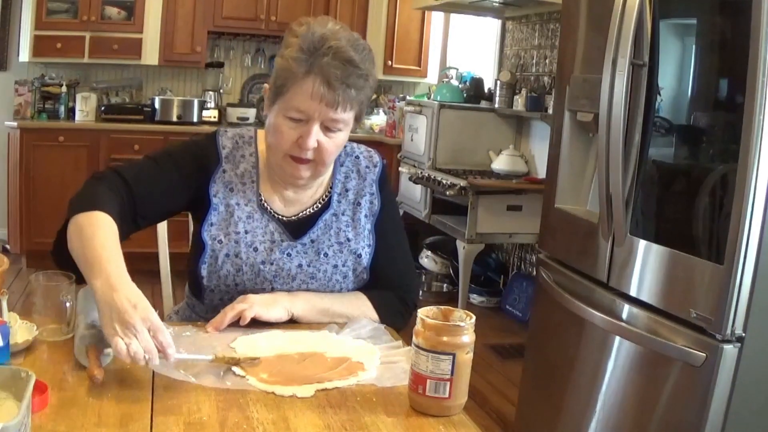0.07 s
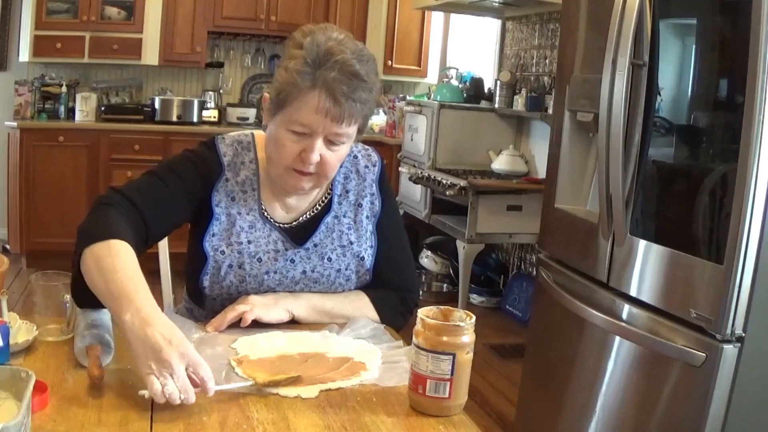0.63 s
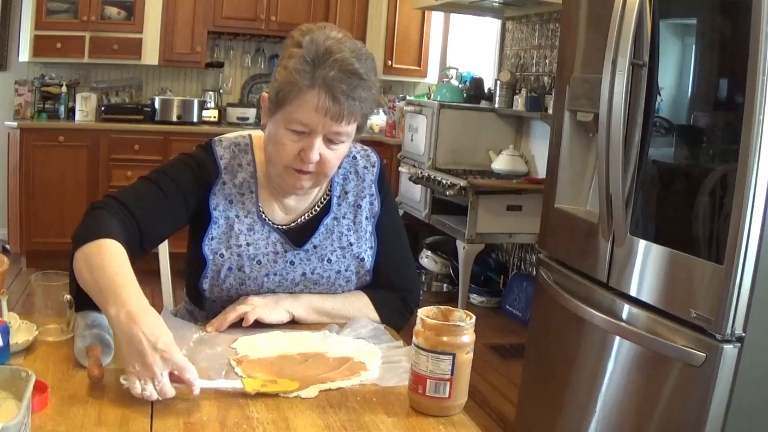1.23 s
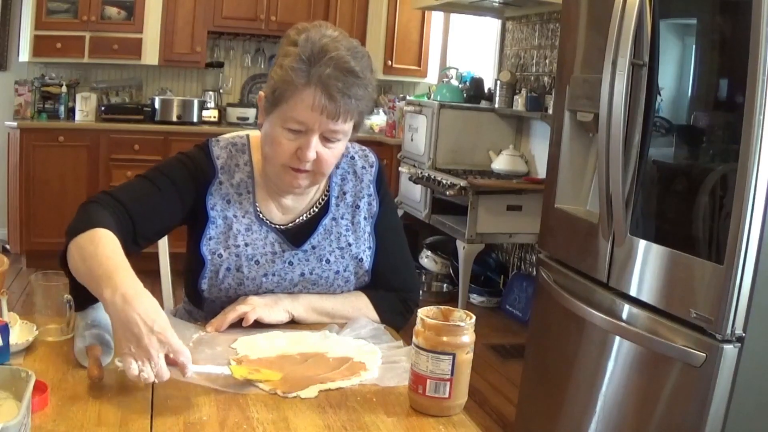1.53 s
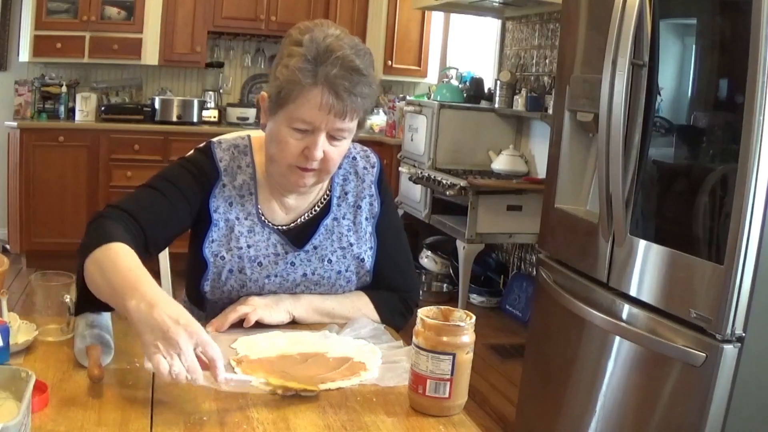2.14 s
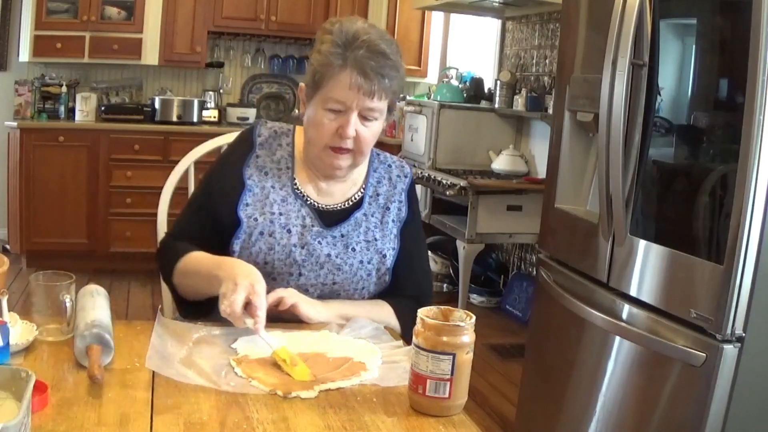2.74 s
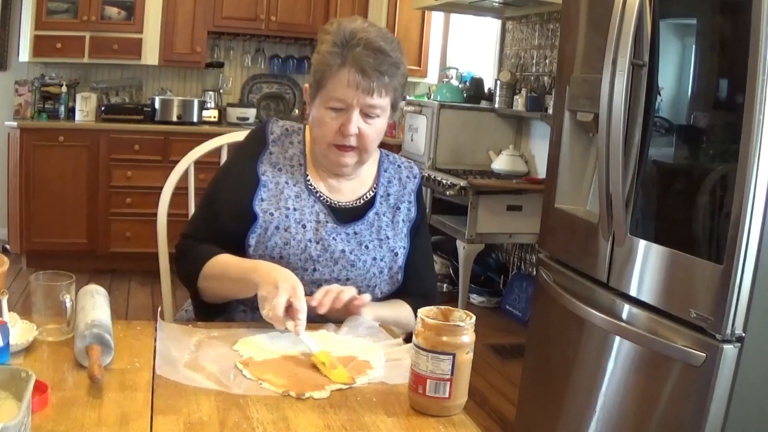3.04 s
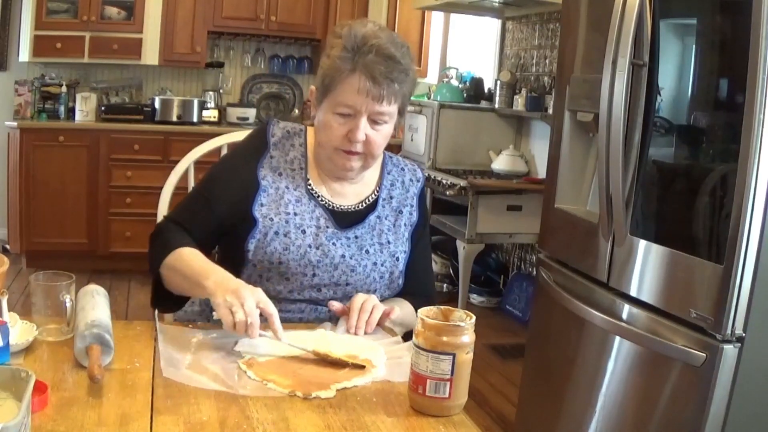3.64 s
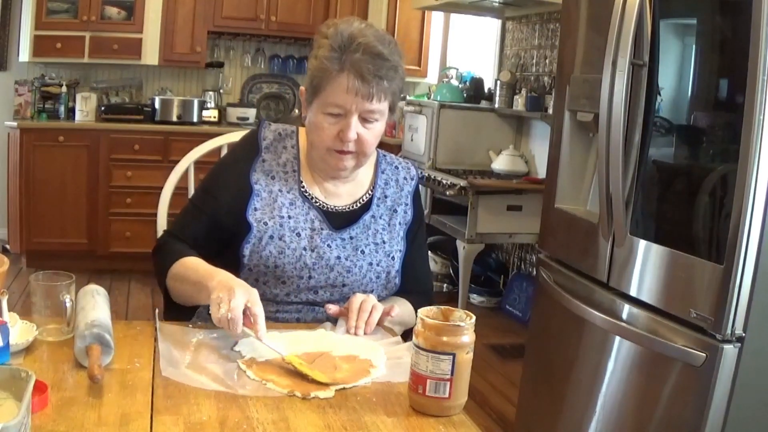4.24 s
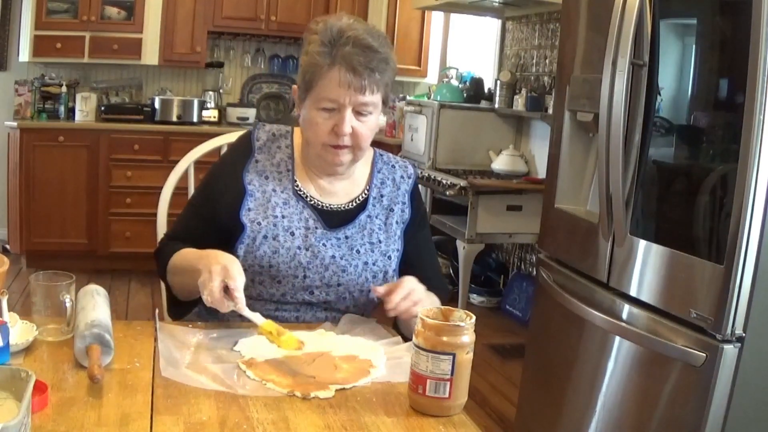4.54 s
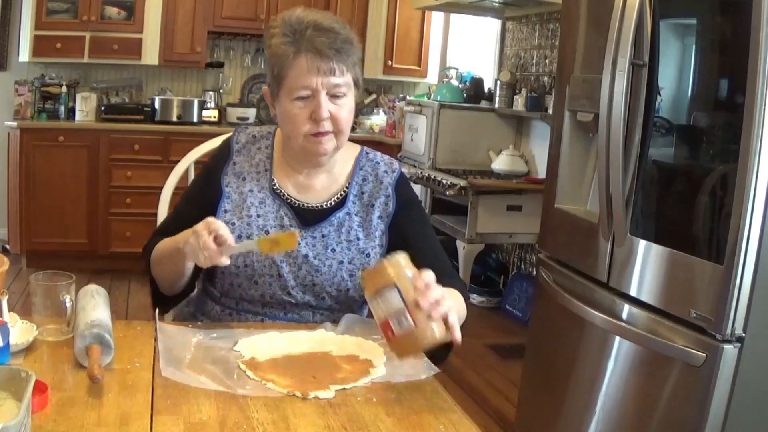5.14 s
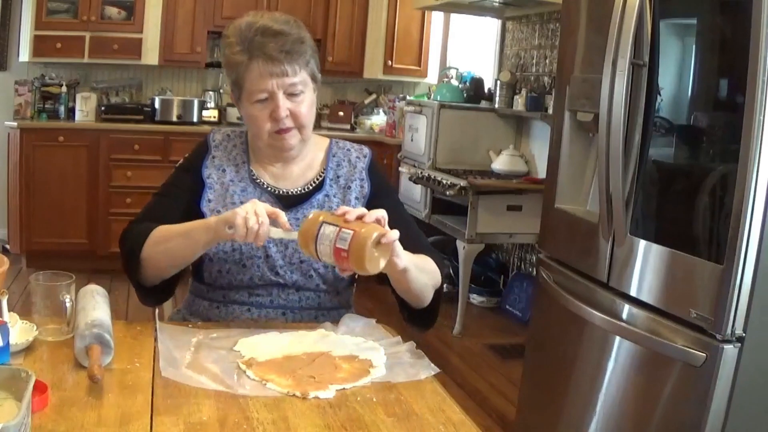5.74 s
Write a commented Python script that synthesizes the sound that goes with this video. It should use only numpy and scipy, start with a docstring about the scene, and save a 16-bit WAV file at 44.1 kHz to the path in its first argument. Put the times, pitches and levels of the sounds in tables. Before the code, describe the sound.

In a quiet kitchen, a crisp burst of wax paper crinkling thins out into small snaps and light rustles as dough is spread with a spatula. One light knock on wood is followed by a thin hiss of a hand on the paper and further crackles. Then a jar bumps softly twice on the table as it is lifted. A refrigerator hums and ticks faintly behind the nearby handling.

```python
"""Wax paper slides, rustles and snaps on a wooden kitchen table as a spatula spreads peanut butter
over the rolled dough on it. Stick-slip friction makes the rustle, buckling creases the snaps.
The spatula knocks once, a hand glides over the wax, and a jar is taken up with two soft bumps
that excite the modes of the table top. Sleeve, hand and jar brush the wood.
The kitchen reverberates, while a refrigerator hums and ticks faintly over the room noise."""
import sys
import numpy as np
from scipy import signal
from scipy.fft import rfft, irfft, next_fast_len
from scipy.io import wavfile

SR = 44100
rng = np.random.default_rng(int(sys.argv[2]) if len(sys.argv) > 2 else 0)


def wav_out(sig):
    """Save sig, one row per channel (or a flat mono array), as 16-bit PCM at SR to the path in sys.argv[1]."""
    wavfile.write(sys.argv[1], SR, np.round(np.clip(np.atleast_2d(sig).T, -1, 1) * 32767).astype(np.int16))


N = 263718

# creases snapping over: (t/s, level over 10 ms/dB, swell time/s, flap resonance f/Hz)
CREASE_SNAPS = [(0.075, -40.5, .0025, 7900), (0.0877, -33.5, 0.00037, 10100), (0.189, -39, 0.001, 10500),
                (0.2418, -26.5, 0.00053, 10200), (0.2677, -27, 0.0016, 9100), (0.2816, -30, 0.0019, 6960),
                (0.3025, -35, 0.0019, 5450), (0.316, -39.5, 0.0013, 8850), (0.501, -35, 0.002, 9500),
                (0.5514, -40.5, .0007, 9800), (0.7004, -54, .0012, 1800), (0.761, -36, 0.0013, 9500),
                (1.2225, -43, 0.0022, 9000), (1.2582, -45, 0.0012, 7000), (1.344, -46.5, 0.00071, 5460),
                (1.388, -42, .0014, 2110), (1.4063, -43.5, 0.0014, 2580), (1.4715, -59, 0.0016, 2500),
                (1.631, -43.5, 0.0016, 8450), (1.719, -52.5, 0.0013, 9400), (1.9067, -53, 0.0021, 9500),
                (2.4688, -51, 0.0019, 8700), (2.506, -51.5, 0.0008, 8450), (2.8375, -52.5, 0.00098, 10200),
                (3.1322, -48.5, 0.00029, 9700), (3.347, -35.5, 0.0039, 5600), (3.358, -39, 0.0015, 1910),
                (3.4003, -30, 0.00059, 1940), (3.4983, -45.5, 0.00095, 2310), (3.5508, -47, .0004, 9300),
                (3.7048, -50, .0007, 6000), (3.7246, -47.5, .0011, 5540), (3.887, -41.5, 0.00097, 10400),
                (3.9147, -46.5, 0.00076, 10200), (4.046, -38, 0.0026, 8800), (4.345, -49.5, .0013, 1800),
                (4.3741, -40.5, 0.00064, 2050), (4.43, -40.5, 0.00092, 6050), (4.6587, -55.5, 0.0013, 4640),
                (5.044, -51, .0013, 5800)]
# spectrum of the paper's crisp crackle: (f/Hz, relative spectral density/dB)
CRACKLE_SPECTRUM = [(1200, -27), (2500, -13), (4000, -4.5), (6000, -2.5), (8000, -.5), (9600, 1.5),
                    (11000, -5.5), (14000, -6)]


def from_db(db):
    """Amplitude ratio: a factor of ten for every 20 dB."""
    return 10 ** (np.asarray(db) / 20)


def rms_one(x):
    """Normalisation to unit mean power."""
    return x / np.sqrt(np.mean(x ** 2) + 1e-20)


def clock():
    """Uniform sampling: t/s of each sample."""
    return np.arange(N) / SR


def at_hz(points, hz):
    """Interpolation of a table along logarithmic frequency."""
    known, values = np.transpose(points)
    return np.interp(np.log(np.maximum(hz, 1)), np.log(known), values)


def colour(x, spectrum):
    """Minimum-phase filtering to the given spectrum, at unit power gain."""
    size = next_fast_len(N + SR // 10) // 2 * 2
    gain = rms_one(from_db(at_hz(spectrum, np.fft.rfftfreq(size, 1 / SR))))
    cepstrum = irfft(np.log(gain))
    cepstrum[1:size // 2] *= 2  # folding onto positive time makes the filter causal
    cepstrum[size // 2 + 1:] = 0
    return irfft(rfft(x, size) * np.exp(rfft(cepstrum)), size)[..., :N]


def drift(per_s):
    """Random modulation of unit power: straight lines between Gaussian values."""
    knots = np.arange(0, N / SR + 1, 1 / per_s)
    return rms_one(np.interp(clock(), knots, rng.standard_normal(N)[:len(knots)]))


def swell(start, end):
    """Half-sine envelope: a movement sets in and dies away."""
    return np.sin(np.pi * np.clip((clock() - start) / (end - start), 0, 1))


def stereo(mid, side, side_db):
    """Sum and difference: mid reaches the ears in phase, side in antiphase."""
    return mid + from_db(side_db) * side * [[1], [-1]]


def narrow_noise(hz, width_hz):
    """A randomly driven resonance: a band of noise mostly common to both ears."""
    band = signal.butter(2, [hz - width_hz / 2, hz + width_hz / 2], "band", fs=SR, output="sos")
    mid, side = rng.standard_normal((2, N))
    return rms_one(signal.sosfilt(band, stereo(mid, side, side_db=-7.5)))


def grains(per_s, spread_db):
    """A Poisson process of tiny slips, of uneven size and either sign."""
    sizes = from_db(spread_db * np.minimum(rng.exponential(1, N), 4))
    slips = rng.random(N) < per_s / SR
    return rms_one(slips * sizes * rng.choice([-1, 1], N))


def push(s, db, contact_s):
    """Impact force: a smooth pulse of given impulse, the duller the longer the contact."""
    pulse = np.sin(np.pi * np.clip((clock() - s) / contact_s, 0, 1)) ** 2
    return from_db(db) * pulse / pulse.sum()


def ring(force, modes):
    """Modal superposition: a force drives damped resonators, neighbours in opposite phase."""
    out = np.zeros(N)
    for k, (hz, db, t60) in enumerate(modes):
        radius, angle = from_db(-60 / (t60 * SR)), 2 * np.pi * hz / SR
        feedback = [1, -2 * radius * np.cos(angle), radius ** 2]
        out += (-1) ** k * from_db(db) * signal.lfilter([.5, 0, -.5], feedback, force + 1e-18)
    return out


def sheet_motion():
    """Incoherent powers add: stirring, strokes and settling give crackle and drag envelopes in dB."""
    # strokes pushing the paper: (full speed t/s, 20 dB rise time/s, hold/s, crackle/dB, drag/dB)
    strokes = [(0.0, .05, 0.049, -56.5, -54.5), (0.102, 0.077, 0.039, -41.5, -52.5),
               (0.254, 0.13, 0.038, -31.5, -42), (0.402, 0.12, 0.02, -44.5, -48.5),
               (1.238, 0.2, 0.033, -55.5, -55), (1.391, 0.14, .02, -51, -48.5),
               (1.539, 0.053, .01, -51.5, -50.5), (2.47, 0.089, 0.087, -63, -66),
               (2.931, 0.17, 0.092, -50.5, -54.5), (3.163, 0.28, 0.049, -52, -53.5),
               (3.352, 0.011, 0.0055, -44, -56), (3.916, 0.039, 0.013, -55.5, -58.5),
               (4.372, .035, .015, -53, -48.5), (4.87, 0.068, 0.058, -63, -64)]
    release_db_per_s, settle_db_per_s = 187, 152
    drag_follows = 0.85  # share of the crackle's rise and fall
    t = clock()
    lifted_db = 7 * (t > 4.5)  # the sheet stirs less once the spatula is lifted
    crackle_power = from_db(-72.5 - lifted_db) ** 2
    drag_power = from_db(-69.5 - lifted_db) ** 2
    for s, rise_s, hold_s, crackle_db, drag_db in strokes:
        rise_db = 20 * (t - s) / rise_s
        release_db = release_db_per_s * (s + hold_s - t)
        shape_db = np.clip(np.minimum(rise_db, release_db), -100, 0)
        crackle_power += from_db(crackle_db + shape_db) ** 2
        drag_power += from_db(drag_db + drag_follows * shape_db) ** 2
    for s, db, swell_s, _ in CREASE_SNAPS:
        after = slice(int(s * SR), int(s * SR) + SR // 2)
        fall_db = settle_db_per_s * (t[after] - s)
        share = swell_s / 0.0012  # slower snaps leave more rustle
        crackle_power[after] += share * from_db(db - 15 - fall_db) ** 2
        drag_power[after] += share * from_db(db - 17.5 - drag_follows * fall_db) ** 2
    return 10 * np.log10(crackle_power), 10 * np.log10(drag_power)


def rubbing(crackle_db, drag_db):
    """Stick-slip friction: dense slips in clumps of a few milliseconds, and scattered lone ticks."""
    # the paper's dull drag on the table: (f/Hz, relative spectral density/dB)
    drag_spectrum = [(100, -14), (300, -7), (700, -4), (1300, -4), (1900, 0.5), (2800, -3), (4000, -2.5),
                     (7000, -17.5)]
    clumps = rms_one(from_db(2 * np.clip(drift(per_s=420), -2, 2.5)))
    crackle = from_db(crackle_db + 2) * clumps * grains(per_s=11000, spread_db=1)
    drag = from_db(drag_db) * clumps * grains(per_s=9000, spread_db=-2)
    # ticks grow only slowly with the rubbing, so they stand out when the sheet barely moves
    ticks = from_db(crackle_db / 2 - 36.5) * grains(per_s=27, spread_db=-6.5)
    ticks *= crackle_db > -72
    return colour(crackle + ticks, CRACKLE_SPECTRUM) + colour(drag, drag_spectrum)


def brushing():
    """Sliding friction: cloth, skin and the jar's base swish softly over the table."""
    # passes of sleeve, hand and jar: (start t/s, end t/s, level/dB)
    passes = [(0.0, 0.33, -56.5), (0.607, 0.85, -54.5), (1.335, 1.46, -58), (4.908, 4.997, -55.5)]
    # their friction noise: (f/Hz, relative spectral density/dB)
    swish_spectrum = [(30, 0), (120, -8.5), (330, 2), (700, -3.5), (1400, -10), (4000, -21)]
    envelope = sum(from_db(db) * swell(start, end) for start, end, db in passes)
    return envelope * colour(rng.standard_normal(N), swish_spectrum)


def refrigerator():
    """Resonance and periodic excitation: a wavering hum, and chirps that repeat as the machine turns."""
    # hum resonances: (f/Hz, bandwidth/Hz, level/dB)
    resonances = [(239, 14, -72), (383, 6.5, -74), (499, 8.6, -71), (675.7, 23.5, -69.5), (1005, 33, -74.5),
                  (1704, 105, -69.5), (2773, 48, -81.5)]
    # chirp trains: (start t/s, end t/s, delay in the cycle/s, f/Hz, typical peak level/dB)
    chirps = [(0, 6, .009, 2820, -67), (0, 6, .011, 3480, -64), (0, 5, .044, 3580, -66),
              (5, 6, .013, 4010, -69), (5, 6, .046, 4010, -67)]
    cycle_hz, chirp_sigma_s, pitch_wander, uneven_db = 15, .0022, .016, 3.5
    out = sum(from_db(db) * narrow_noise(hz, width) for hz, width, db in resonances)
    t = clock()
    for start, end, delay, hz, db in chirps:
        from_peak_s = (((t - delay) * cycle_hz + .5) % 1 - .5) / cycle_hz
        gate = np.exp(-.5 * (from_peak_s / chirp_sigma_s) ** 2) * (t > start) * (t < end)
        pitch_hz = hz * (1 + pitch_wander * drift(per_s=280))
        phase = 2 * np.pi * np.cumsum(pitch_hz) / SR
        out += from_db(db + uneven_db * drift(per_s=8.8)) * gate * np.sin(phase)
    return out


def air():
    """Interaural coherence: steady room noise is most alike in both ears at long wavelengths."""
    # background noise of the kitchen: (f/Hz, relative spectral density/dB)
    room_spectrum = [(15, -54), (25, -15.5), (138, -7), (241, -9), (274, -3.5), (296, -8.5), (703, -3.5),
                     (1170, -12), (1710, -18.5), (2000, -19), (2780, -15.5), (3770, -20.5), (4070, -21.5),
                     (4630, -22), (11000, -28.5), (14300, -81), (22000, -120)]
    mid, side = colour(rng.standard_normal((2, N)), room_spectrum)
    side = signal.sosfilt(signal.butter(1, 340, "high", fs=SR, output="sos"), side)
    return from_db(-60) * stereo(mid, side, side_db=-5.5)


def snapping(snaps):
    """Buckling: a crease gives way in a short avalanche of slips that shakes the flap beside it."""
    # dull sound of a flexing crease: (f/Hz, relative spectral density/dB)
    flex_spectrum = [(300, -13.5), (700, -10.5), (1250, -15), (1750, 3.5), (2300, 0), (3200, 2), (4800, -2),
                     (7000, -14)]
    crack_db, sudden_s, flap_db = -2.5, 0.0013, -9
    crackle, flexing, flaps = np.zeros((3, N))
    size = SR // 20
    per_10_ms = np.sqrt(SR / 100 / size)  # refers a burst's energy to 10 ms
    fine, coarse = grains(per_s=24000, spread_db=4), grains(per_s=16000, spread_db=0)
    for s, db, swell_s, hz in snaps:
        at = slice(int(s * SR), int(s * SR) + size)
        gain = from_db(db) * per_10_ms
        age = np.arange(size) / SR / swell_s
        envelope = age * np.exp(-age)
        burst = rms_one(fine[at] * envelope)
        # the more sudden the snap, the more of it is one single crack
        burst[np.argmax(age > .7)] += np.sqrt(size) * from_db(crack_db) * np.exp(-swell_s / sudden_s)
        burst = rms_one(burst)
        crackle[at] += gain * burst
        flex_db = -4 - 1.06 * hz / 1000  # a large, low flap has more of the dull part
        flexing[at] += gain * from_db(flex_db) * rms_one(coarse[at] * envelope)
        flap = signal.lfilter(*signal.iirpeak(hz, Q=5, fs=SR), burst)
        flaps[at] += gain * from_db(flap_db) * rms_one(flap)
    return colour(crackle, CRACKLE_SPECTRUM) + colour(flexing, flex_spectrum) + flaps


def crumpling(crackle_db):
    """Buckling threshold: small creases give way under a hard push; rows as in CREASE_SNAPS."""
    per_s, threshold_db, swell_s = 36, -42, 0.00068
    low_hz, high_hz = 5570, 10700
    jitter, strength, pitch = rng.random((512, 3)).T
    s = (np.arange(len(jitter)) + jitter) / per_s
    db = -41 + 2.5 * (2 * strength - 1)
    hz = low_hz + pitch * (high_hz - low_hz)
    pushed = np.interp(s, clock(), crackle_db) > threshold_db
    return np.column_stack([s, db, np.full(len(s), swell_s), hz])[pushed].tolist()


def spatula():
    """Impact excitation: brief contacts of the spatula with the wood ring as one light knock."""
    # contacts: (t/s, impulse level/dB, contact time/s)
    contacts = [(2.2332, -47, 0.00036), (2.2404, -53, 0.00047), (2.274, -62, 0.00036)]
    # modes of the knock: (f/Hz, gain/dB, T60/s)
    modes = [(255, -6, 0.18), (338, 7.5, 0.042), (594, -0.5, 0.09), (723, -7, 0.11), (785, -4, 0.18),
             (990, 8, 0.024), (1240, -14, 0.095), (1840, -2, 0.043)]
    return ring(sum(push(*contact) for contact in contacts), modes)


def gliding():
    """Friction noise: dry skin on wax gives a fine, high hiss."""
    # the hand's glide: (start t/s, end t/s, level/dB, centre f/Hz, bandwidth/Hz)
    glides = [(2.747, 3.282, -55, 9500, 2400)]
    hiss = sum(from_db(db) * swell(start, end) * narrow_noise(hz, width)
               for start, end, db, hz, width in glides)
    return hiss.mean(axis=0)


def table_bumps():
    """Plate vibration: jar and arm strike the table top, which booms in its modes."""
    # bumps of jar and arm: (t/s, impulse level/dB, contact time/s)
    bumps = [(4.887, -44, 0.0019), (4.936, -50.5, 0.00042), (4.9411, -48.5, 0.00037), (4.945, -34, 0.00655),
             (4.952, -38, 0.0067)]
    # modes of the table top: (f/Hz, gain/dB, T60/s)
    modes = [(62, -15, 0.17), (125.7, -3, 0.35), (219, -0.5, 0.18), (283, 2.5, 0.063), (424, -22, .1),
             (702, 1, 0.073), (1555, -4, 0.062)]
    return ring(sum(push(*bump) for bump in bumps), modes)


def kitchen(x, wet_db, early_db, early_s):
    """Reverberation: early reflections off table and cupboards, then a tail that decays band by band."""
    # reverberation time: (f/Hz, T60/s)
    decay_times = [(150, 0.19), (1000, 0.35), (4000, 0.34), (10000, 0.2)]
    # difference of the reverberation between the ears: (f/Hz, side minus mid level/dB)
    widths = [(150, 3), (600, -3.5), (4000, -1), (9000, -5)]
    t = clock()[:SR * 3 // 4]
    mid, side = rng.standard_normal((2, len(t)))
    response = np.zeros((2, len(t)))
    edges_hz = np.geomspace(60, 15360, num=9)
    for low, high in zip(edges_hz, edges_hz[1:]):
        hz = np.sqrt(low * high)
        octave = signal.butter(2, [low, high], "band", fs=SR, output="sos")
        band = signal.sosfilt(octave, stereo(mid, side, at_hz(widths, hz)))
        response += band * from_db(-60 * t / at_hz(decay_times, hz))
    response *= (t > .002) * (1 + from_db(early_db) * np.exp(-t / early_s))
    response = rms_one(response) / np.sqrt(len(t))  # unit energy
    return from_db(wet_db) * signal.fftconvolve(x[None], response, axes=1)[:, :N]


def wandering_reflections(paper):
    """A moving source: the sounding spot wanders over the sheet, blending two reflection patterns."""
    angle = np.pi / 4 + drift(per_s=4.004)
    shares = np.cos(angle) * paper, np.sin(angle) * paper
    return sum(kitchen(share, wet_db=-6, early_db=7.5, early_s=0.0077) for share in shares)


def from_left(x, share, band_hz):
    """Interaural level difference: one band is louder in the nearer, left ear."""
    band = signal.sosfilt(signal.butter(1, band_hz, "band", fs=SR, output="sos"), x)
    return x + share * band * [[1], [-1]]


def scene():
    """Superposition: the paper a little to the left, knock and bumps, their reverberation, the room."""
    crackle_db, drag_db = sheet_motion()
    paper = rubbing(crackle_db, drag_db) + gliding()
    paper += snapping(list(CREASE_SNAPS) + crumpling(crackle_db))
    paper = from_left(paper + wandering_reflections(paper), share=0.12, band_hz=(3500, 9000))
    knock = spatula()
    table = table_bumps() + brushing()
    knock = knock + kitchen(knock, wet_db=-2.5, early_db=-4, early_s=.02)
    table = table + kitchen(table, wet_db=-23, early_db=-6, early_s=0.021)
    return paper + knock + table + refrigerator() + air()


def record(dry):
    """Band limiting: an elliptic low-pass cuts the highest treble steeply."""
    cutoff_hz = 11120
    return signal.sosfilt(signal.ellip(8, .2, 47, cutoff_hz, fs=SR, output="sos"), dry)


dry = scene()
out = record(dry)
wav_out(out)
```